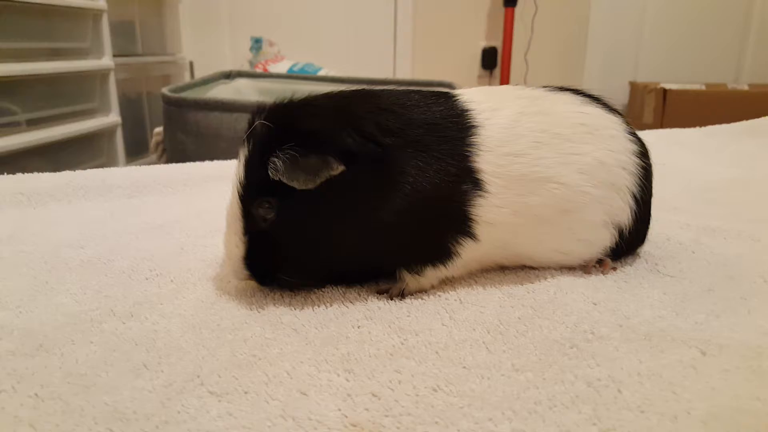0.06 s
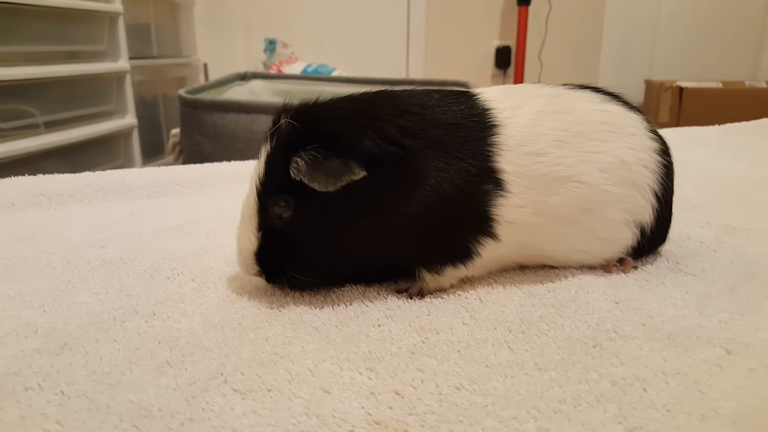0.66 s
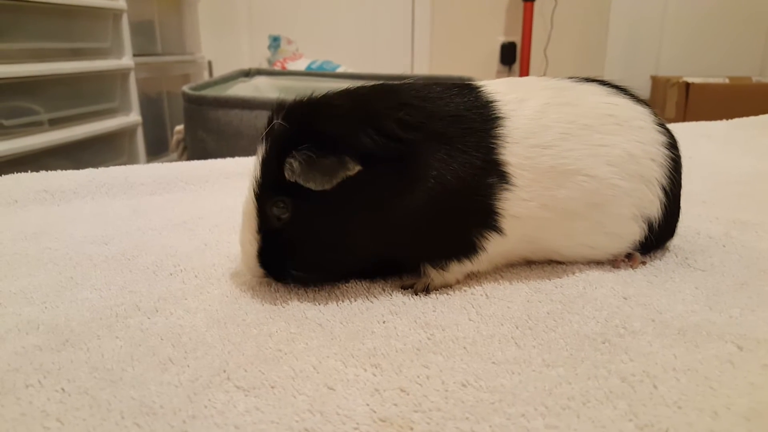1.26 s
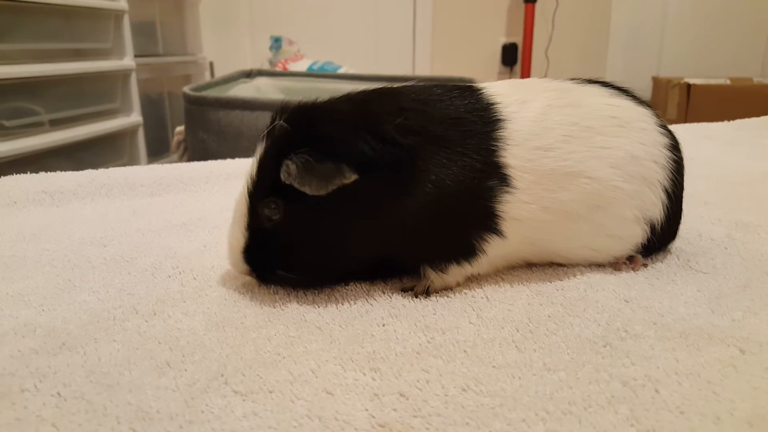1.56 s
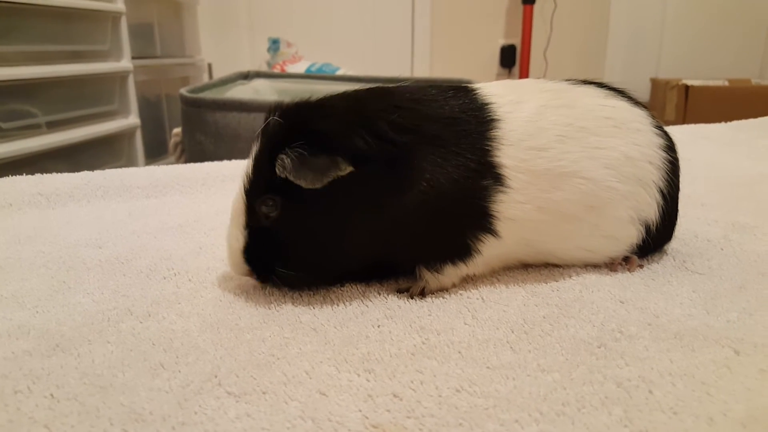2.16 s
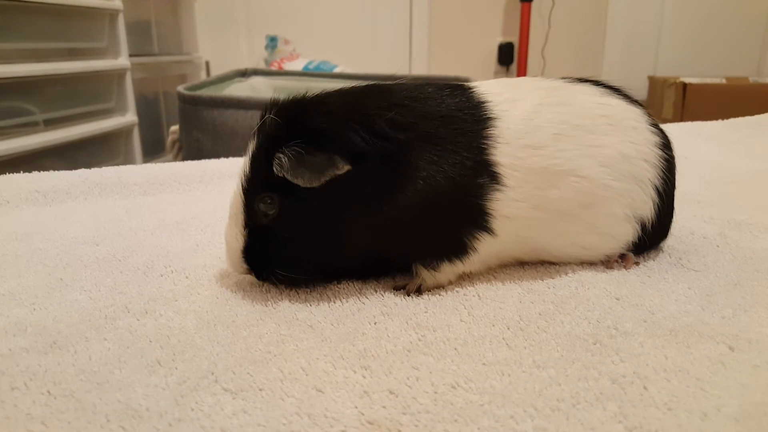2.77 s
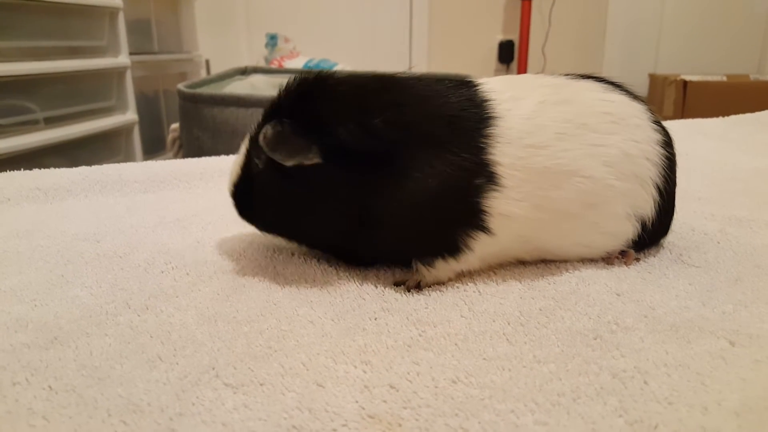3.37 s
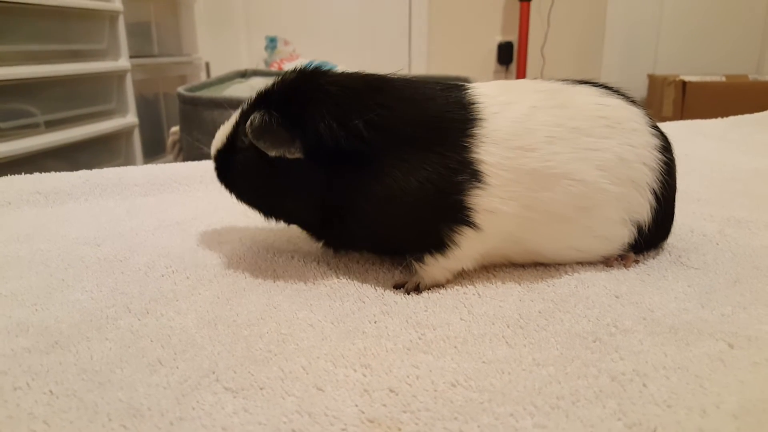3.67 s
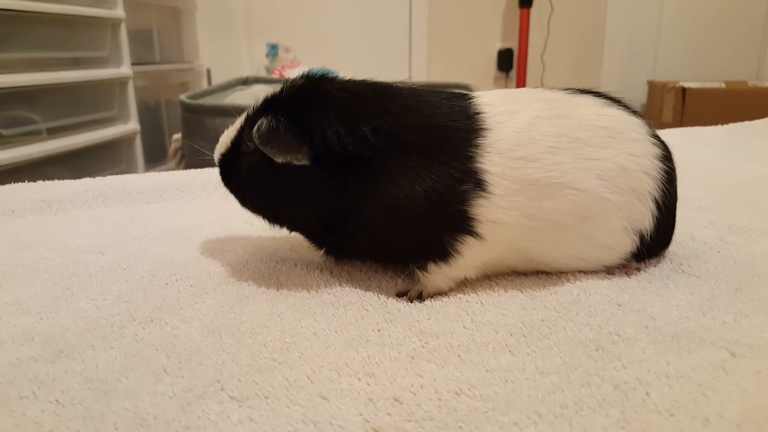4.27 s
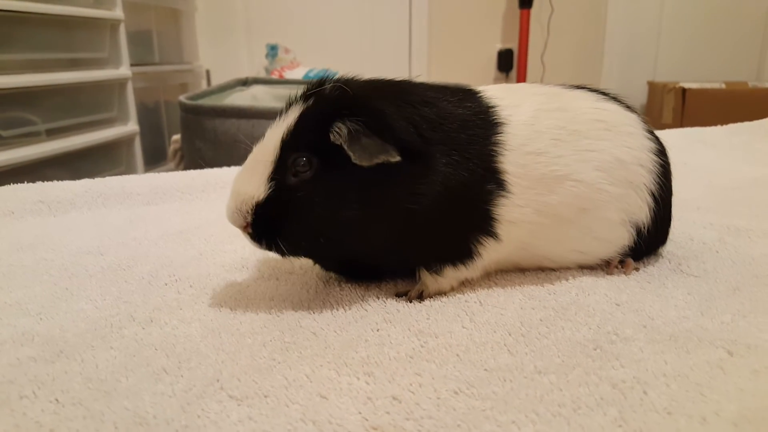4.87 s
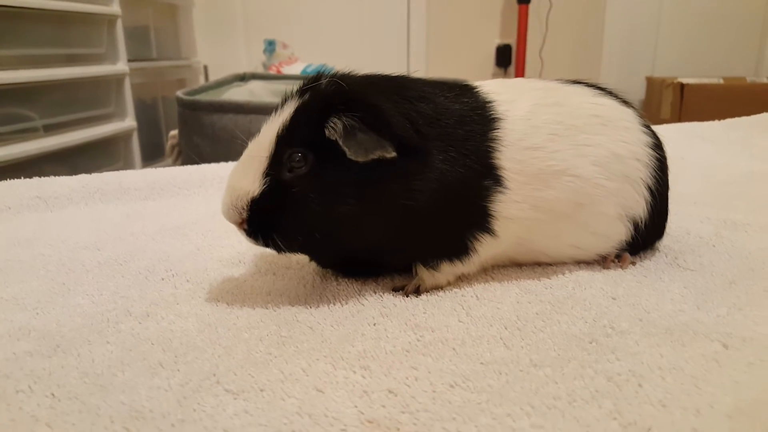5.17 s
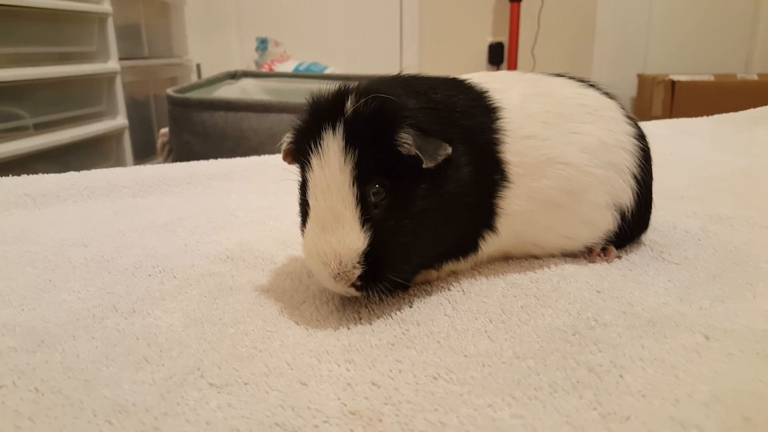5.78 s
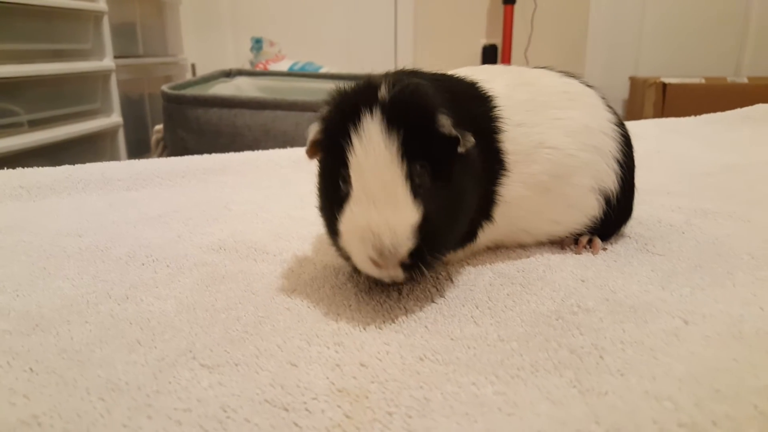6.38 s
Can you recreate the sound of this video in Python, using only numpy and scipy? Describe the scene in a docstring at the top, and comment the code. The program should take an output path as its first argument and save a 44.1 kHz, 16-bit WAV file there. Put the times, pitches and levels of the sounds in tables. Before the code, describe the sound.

A guinea pig chutters close to the microphone in a small furnished room for about six and a half seconds. Each squeak is a very short, clean note that flicks upward at its end, with a slight room echo. For the first 3 seconds the calls are soft, fairly low and even, about five a second. Between roughly 0.4 and 2.3 seconds, faint padded bumps and brief rubs come as the animal shifts on a towel. From about 3.3 seconds the squeaks become louder, higher and brighter, often in quick pairs until 4.7 seconds. Fur rustles faintly, with small swells of low rumble as the head moves. From about 5.7 seconds come the last four calls, slightly longer, the loudest, and more clearly rising. Quiet room air, hiss and a faint low electrical hum continue underneath throughout.

```python
"""Short, soft squeaks come one after another: a guinea pig on a towel chutters close to a phone.
Its vocal folds hold a clean note, then tighten so that the note flicks upward as it ends.
Nearby surfaces and the small furnished room answer each squeak. As the animal moves, fur and cloth
rustle faintly and its body makes a few soft bumps. Behind it all are mains hum, room rumble and hiss."""
import sys
import numpy as np
from scipy import signal
from scipy.fft import rfft, irfft, next_fast_len
from scipy.io import wavfile
from scipy.ndimage import uniform_filter1d

SR = 44100
rng = np.random.default_rng(int(sys.argv[2]) if len(sys.argv) > 2 else 0)


def transcribe(u):
    """Save the signal u as a 16-bit wav file named by the first command-line argument.

    u: samples, shape (n,) or (channels, n), limited to [-1, 1]; the rate is SR.
    q: integer samples, one column per channel.
    """
    v = np.clip(np.atleast_2d(u).T, -1, 1)
    q = np.round(v * 32767).astype(np.int16)
    wavfile.write(sys.argv[1], SR, q)


N = 292383
TIME = np.arange(N) / SR

# The calls. Each row: start in seconds, length in seconds, hold before the flick in seconds,
# base pitch in Hz, base level in dB, swell up to that level in dB.
SQUEAKS = [(0.039, 0.018, 0.0095, 518.0, -41.0, 0.0), (0.172, 0.056, 0.0515, 624.0, -41.0, 0.0),
           (0.48, 0.018, 0.012, 497.0, -51.5, 0.0), (0.708, 0.053, 0.0475, 623.0, -43.5, 7.0),
           (0.907, 0.058, 0.058, 669.0, -40.5, 14.0), (1.095, 0.047, 0.039, 591.0, -41.0, 0.0),
           (1.256, 0.06, 0.049, 612.0, -40.0, 0.0), (1.445, 0.061, 0.0605, 624.0, -39.0, 2.0),
           (1.632, 0.066, 0.0585, 628.0, -38.5, 1.0), (1.817, 0.07, 0.065, 639.0, -39.0, 1.0),
           (2.022, 0.064, 0.0565, 620.0, -38.5, 3.0), (2.207, 0.066, 0.062, 610.0, -39.0, 0.0),
           (2.435, 0.06, 0.0615, 571.0, -43.5, 0.0), (2.644, 0.063, 0.0545, 595.0, -40.0, 0.0),
           (2.839, 0.072, 0.0665, 604.0, -40.0, 1.0), (3.174, 0.042, 0.036, 627.0, -45.0, 8.0),
           (3.342, 0.06, 0.0465, 668.0, -39.5, 1.0), (3.45, 0.058, 0.0435, 703.0, -41.0, 0.0),
           (3.626, 0.071, 0.0535, 699.0, -35.5, 1.0), (3.724, 0.064, 0.049, 774.0, -35.5, 0.0),
           (3.915, 0.073, 0.063, 666.0, -36.5, 4.0), (4.032, 0.06, 0.047, 633.0, -40.0, 0.0),
           (4.219, 0.068, 0.0615, 680.0, -36.0, 4.0), (4.331, 0.063, 0.0465, 645.0, -40.5, 0.0),
           (4.524, 0.068, 0.0555, 688.0, -35.5, 4.0), (4.629, 0.059, 0.0445, 664.0, -36.0, 1.0),
           (4.817, 0.086, 0.0605, 676.0, -35.0, 1.0), (5.104, 0.075, 0.062, 659.0, -36.0, 3.0),
           (5.354, 0.066, 0.059, 662.0, -36.5, 6.0), (5.459, 0.055, 0.0415, 651.0, -35.5, 2.0),
           (5.565, 0.048, 0.041, 812.0, -36.0, 5.0), (5.736, 0.083, 0.06, 717.0, -32.5, 7.0),
           (5.977, 0.096, 0.069, 692.0, -35.0, 4.0), (6.179, 0.1, 0.072, 702.0, -33.0, 4.0),
           (6.398, 0.1, 0.0715, 681.0, -33.0, 3.0)]
# The voice with the head tucked down, then raised, then turned to the phone. Each row: time in seconds,
# second harmonic boost in dB, upper harmonics boost in dB, mouth cut-off in Hz, flick gain in dB/octave.
POSTURE = [(.2, -4, -1, 2200, -13.5), (1.5, -2, 3, 2250, -11), (3.1, -3, -1, 2180, -15),
           (3.4, 3, 9, 1880, 7.5), (3.95, 3, 5.5, 1780, -3.5), (4.65, .5, 4, 1830, 4),
           (4.8, -3, -8.5, 2560, .5), (5.5, -5.5, -6.5, 2610, -2.5), (6, -4, -.5, 2650, -4.5),
           (6.2, -3, -1.5, 3250, 3)]
# How the throat shapes the voice. Each row: frequency in Hz, gain in dB.
THROAT_CURVE = [(500, -1.5), (650, 0), (1000, -0.5), (1300, -4.5), (1950, -7), (2450, -8.5), (2800, -4.5),
                (3200, -16.5), (3700, -24), (4200, -40)]
# Where the head points. Each row: time in seconds, left minus right level in dB, left lead in ms.
HEAD_DIRECTION = [(0, 1.3, 0.1), (2.2, 1, 0.14), (3.7, 1, 0.12), (5.2, 0.5, 0.16), (5.8, -1, 0.12),
                  (6.4, -1.5, 0.053)]
# The right microphone is shaded from the animal. Each row: frequency in Hz, gain in dB.
SHADE_CURVE = [(600, 0.45), (900, -2), (1300, -2.5), (2000, -6.2), (3200, -0.5)]
# Echoes from near surfaces. Each row: delay in ms, left gain in dB, right gain in dB.
NEAR_ECHOES = [(12.58, -29, -28), (20.42, -32.5, -25.5)]
# The tone of the room's fading tail. Each row: frequency in Hz, gain in dB.
ROOM_CURVE = [(200, -8), (600, 5), (800, 11), (1000, 11), (1400, 3), (2000, 4), (3000, 2), (8000, 0)]
# The body shifts on the towel. Each row: start in seconds, bump level in dB, rustle level in dB.
SHUFFLES = [(.405, -63.5, -69), (.513, -61, -65), (.752, -60, -66), (.937, -59, -72), (.975, -62.5, -66),
            (1.15, -58.5, -68), (1.405, -62, -67), (1.863, -55.5, -67), (1.885, -56, -63),
            (2.115, -65, -66), (2.244, -59.5, -64)]
# The low notes a bump rings with. Each row: frequency in Hz, relative level in dB.
BUMP_NOTES = [(105, -7.5), (158, 3), (188, -3), (262, -19), (345, -9.5), (420, -10.5)]
# The tone of the rubbing inside a bump. Each row: frequency in Hz, gain in dB.
RUB_CURVE = [(60, -82), (180, 20), (450, 5), (1500, 0), (6000, -70)]
# Head movements brush the fur and stir a rumble.
# Each row: peak time in seconds, half length in seconds, rustle level in dB, rumble level in dB.
HEAD_MOVES = [(3.297, .014, -62.5, -80), (3.54, .16, -73, -64), (4.66, .06, -69, -72),
              (4.82, .06, -65, -68), (5.81, .05, -68, -72), (6.1, .1, -70.5, -70), (6.43, .07, -65, -62)]
# Brief rubs and one low swell of rumble.
# Each row: peak time in seconds, half length in seconds, level in dB, centre in Hz.
RUBS_AND_SWELL = [(.302, .012, -65, 780), (1.405, .01, -69, 2900), (1.438, .012, -60, 730),
                  (1.748, .017, -56, 730), (2.135, .022, -56, 660), (4.77, .08, -62.5, 86),
                  (6.5, .08, -68, 330)]
# The tone of three noises: rustle, rumble, and air with hiss. Each row: frequency in Hz, gain in dB.
RUSTLE_CURVE = [(400, 22), (1200, 11.5), (2500, 11), (4500, 3), (7000, -4), (10000, 3), (12500, -1),
                (16000, -10)]
RUMBLE_CURVE = [(20, -8), (45, -17.5), (85, -3), (130, -5.5), (220, -15), (500, -41.5)]
AIR_CURVE = [(25, 20), (60, 13), (160, 22), (260, 20.5), (450, 18), (900, 15), (1800, 8), (3500, 3.5),
             (7000, -3.5), (10000, -4.5), (13000, -4), (15500, 2.5)]
# How loud the mains hum is. Each row: time in seconds, level in dB.
HUM_LEVELS = [(0, -70), (.55, -71), (2, -80), (3.1, -79), (5.6, -65), (6.6, -65)]

CLIMB_HZ_PER_S, BEND_S = 48000, .006  # every flick bends into the same straight climb
WAVER, JITTER = .006, .006  # slow and quick unsteadiness, as shares of the pitch
PITCH_PER_DB = .017  # share by which the pitch rises with effort
SOFT_DB, DULLING = -40, .6  # below this level the overtones lose an extra .6 dB per dB
RELAXED_HZ, RELAXED_RANGE_HZ = 660, 50  # calls below 660 Hz sag midway, fully so 50 Hz lower
SAG_DB, SAG_OVERTONES_DB, SAG_PITCH = -1.9, -7, .02  # a sag is softer, duller and lower
FLICK_DB, FLICK_OVERTONES_DB = 1, -.6
# A call right after another starts with the folds still tight: higher and brighter.
RECOVER_S, TIGHT_HZ, TIGHT_SETTLE_S, TIGHT_OVERTONES_DB = .025, 250, .007, 5


def squeak(row, tightness, edge_s=.0039, shimmer_db=.75, rasp_db=2.3, slope_db=-5, upper_step_db=-3.2):
    """One call: the vocal folds hold a note, then tighten so that it flicks up as the air runs out."""
    start_s, length_s, hold_s, held_hz, held_db, swell_db = row
    second_db, upper_db, mouth_hz, flick_db_per_octave = read_table(POSTURE, start_s)
    t = np.arange(int(length_s * SR)) / SR
    progress = np.minimum(t / hold_s, 1)
    # In low, relaxed calls the folds slacken midway through the hold.
    relaxed = np.clip((RELAXED_HZ - held_hz) / RELAXED_RANGE_HZ, 0, 1)
    sag = relaxed * (np.sin(np.pi * progress) ** 4 - .3)
    # The pitch follows the growing effort, then bends smoothly into the flick.
    effort_bend = PITCH_PER_DB * swell_db * (progress - 1)
    note_hz = held_hz * (1 + effort_bend - SAG_PITCH * sag + WAVER * drift(90, len(t)))
    climb = np.logaddexp(0, (t - hold_s) / BEND_S)  # near zero, then a straight ramp
    flick_hz = CLIMB_HZ_PER_S * BEND_S * climb
    hz = note_hz + flick_hz + tightness * TIGHT_HZ * np.exp(-t / TIGHT_SETTLE_S)
    # Tense folds sound louder and a little raspy.
    tension = 1 - np.exp(-climb)
    jitter = JITTER * (1 + 2 * tension) * drift(280, len(t))
    phase = 2 * np.pi * np.cumsum(hz * (1 + jitter)) / SR
    note_db = held_db - swell_db * (1 - progress) ** 2
    level_db = note_db + SAG_DB * sag + flick_db_per_octave * np.log2(1 + flick_hz / held_hz)
    level_db += tension * (FLICK_DB + rasp_db * drift(450, len(t)))
    bright_db = SAG_OVERTONES_DB * sag + FLICK_OVERTONES_DB * tension + TIGHT_OVERTONES_DB * tightness
    bright_db += DULLING * np.minimum(note_db - SOFT_DB, 0)
    cutoff_hz = mouth_hz * (1 + .042 * (t / length_s - .5))  # the mouth barely opens
    voice = 0
    for k in range(1, 6):  # harmonic k sounds at k times the pitch
        harmonic_db = slope_db * np.log2(k) + shimmer_db * k * drift(100, len(t))
        if k == 2:
            harmonic_db += bright_db + second_db
        elif k > 2:
            harmonic_db += bright_db + upper_db + upper_step_db * (k - 3)
        mouth = 1 / np.sqrt(1 + (k * hz / cutoff_hz) ** 16)  # swallows what climbs past the cut-off
        voice += gain(harmonic_db) * curve_gain(k * hz, THROAT_CURVE) * mouth * np.cos(k * phase)
    fade = np.sin(np.pi / 2 * np.clip(np.minimum(t, length_s - t) / edge_s, 0, 1)) ** 2
    return voice * fade * gain(level_db)


def guinea_pig():
    """All the squeaks in a row; the vocal folds relax in the pauses."""
    out = np.zeros(N + SR)
    last_end_s = -np.inf
    for row in SQUEAKS:
        start_s, length_s = row[:2]
        tightness = np.exp((last_end_s - start_s) / RECOVER_S)
        add_at(out, start_s, squeak(row, tightness))
        last_end_s = start_s + length_s
    return out[:N]


def direct_path(voice):
    """The voice goes straight to both microphones, reaching the left one slightly sooner."""
    pan_db, lead_ms = read_table(HEAD_DIRECTION, TIME)
    delayed = np.interp(TIME - lead_ms / 1000, TIME, voice)
    return np.array([voice * gain(pan_db / 2), shape_tone(delayed, SHADE_CURVE) * gain(-pan_db / 2)])


def room(voice, ring_s=.22, tail_db=-17, build_s=.0067, width=.73):
    """Near surfaces return two echoes; many later ones blur into a short tail."""
    t = np.arange(SR // 2) / SR
    envelope = die_away(t, ring_s) * np.clip(t / build_s, 0, 1) ** 2
    mid, side = rng.standard_normal((2, len(t))) * envelope
    tail = normalise(left_right(mid, width * side)) / np.sqrt(len(t))
    echoes = shape_tone(tail, ROOM_CURVE) * gain(tail_db)
    for delay_ms, left_db, right_db in NEAR_ECHOES:
        echoes[:, int(delay_ms * SR / 1000)] += gain([left_db, right_db])
    return signal.fftconvolve(voice[None], echoes, axes=1)[:, :N]


def bumps(contact_s=.0027, ring_s=.32, rub_share=.48, detune=.039):
    """Padded knocks: the body's soft push rings low notes that die quickly, with a little rubbing."""
    out = np.zeros(N + SR)
    t = np.arange(SR // 3) / SR
    envelope = (1 - np.exp(-t / contact_s)) * die_away(t, ring_s)
    envelope /= envelope.max()
    for start_s, bump_db, _ in SHUFFLES:
        ring = 0
        for hz, note_db in BUMP_NOTES:
            mistune, offset = rng.standard_normal(2)
            ring += gain(note_db) * np.sin(2 * np.pi * hz * (1 + detune * mistune) * t + np.pi * offset)
        rub = shape_tone(rng.standard_normal(len(t)), RUB_CURVE)
        bump = normalise(ring) + rub_share * normalise(rub)
        add_at(out, start_s, gain(bump_db) * bump * envelope)
    return out[:N]


def rustles(grain_db=4, resting_db=-82, lag_s=.012):
    """Fibres slip in tiny grains whenever the animal shuffles, moves its head or calls."""
    power = gain(resting_db) ** 2
    power += sum(stroke(s + lag_s, half_s=.034, db=db) for s, _, db in SHUFFLES)
    power += sum(stroke(s, half_s, db) for s, half_s, db, _ in HEAD_MOVES)
    power += sum(stroke(s + hold_s, half_s=.035, db=-74) for s, _, hold_s, *_ in SQUEAKS)
    grains = stereo_noise(5800) * gain(grain_db * drift(900, N))
    return lean_right(normalise(shape_tone(grains, RUSTLE_CURVE)) * np.sqrt(power))


def rubs_and_swell(spread=1.2, skirt_db=-26):
    """Brief rubs and one low swell of rumble: noise around one frequency grows and fades."""
    out = np.zeros((2, N + SR))
    t = np.arange(SR // 2) / SR - 1 / 4  # zero at the peak
    for peak_s, half_s, db, hz in RUBS_AND_SWELL:
        band = [(hz / 8, 3 * skirt_db), (hz / 2, skirt_db), (hz / spread, -3), (hz, 0),
                (hz * spread, -3), (hz * 2, skirt_db), (hz * 8, 3 * skirt_db)]
        mid, side = normalise(shape_tone(rng.standard_normal((2, len(t))), band))
        width = min(.3 + hz / 4000, 1)  # higher sounds are wider
        envelope = np.exp(-(t / half_s) ** 2 / 2)
        add_at(out, peak_s + t[0], left_right(mid, width * side) * gain(db) * envelope)
    return out[:, :N]


def air_and_hiss(level_db=-68.5, flicker_db=.7):
    """Still room air and microphone hiss make a nearly steady bed of noise."""
    noise = normalise(shape_tone(stereo_noise(1500), AIR_CURVE))
    return noise * gain(level_db + flicker_db * drift(9, N))


def rumble(resting_db=-75, flutter_db=2.5):
    """Low room noise that swells when the animal moves its head."""
    power = gain(resting_db) ** 2 + sum(stroke(s, half_s, db) for s, half_s, _, db in HEAD_MOVES)
    noise = normalise(shape_tone(stereo_noise(2700), RUMBLE_CURVE))
    return lean_right(noise * np.sqrt(power) * gain(flutter_db * drift(12, N)))


def mains_hum(hz=60, waver_db=1.5):
    """Mains electricity hums on one low note, which fades down and later grows louder."""
    level_db = read_table(HUM_LEVELS, TIME)[0]
    return lean_right(np.sin(2 * np.pi * hz * TIME) * gain(level_db + waver_db * drift(3.1, N)))


def gain(db):
    """Turn decibels into a number to multiply by."""
    return 10 ** (np.asarray(db) / 20)


def read_table(table, time_s):
    """Each column's value at a given time, sliding between the rows."""
    times, *columns = np.transpose(table)
    return [np.interp(time_s, times, column) for column in columns]


def curve_gain(hz, curve):
    """Look up the gain of a tone curve at a frequency."""
    curve_hz, db = np.transpose(curve)
    return gain(np.interp(np.log(np.maximum(hz, 1)), np.log(curve_hz), db))


def shape_tone(x, curve):
    """Turn each frequency of a sound up or down along a curve."""
    size = x.shape[-1]
    padded = next_fast_len(size)
    gains = curve_gain(np.fft.rfftfreq(padded, 1 / SR), curve)
    return irfft(rfft(x, padded) * gains, padded)[..., :size]


def normalise(x):
    """Scale a sound to an average power of 1."""
    return x / np.sqrt(np.mean(x ** 2))


def drift(rate_hz, size):
    """A smooth random wander, mostly between -1 and 1."""
    hold = max(int(SR / rate_hz), 1)
    steps = np.repeat(rng.standard_normal(size // hold + 1), hold)
    return uniform_filter1d(steps, hold)[:size]


def die_away(t, ring_s):
    """A fade that drops 60 dB in ring_s seconds."""
    return np.exp(-np.log(1000) * t / ring_s)


def stroke(peak_s, half_s, db, linger=1.13):
    """The power of one movement, which starts faster than it dies."""
    width_s = half_s * np.where(TIME < peak_s, 1 / linger, linger)
    return gain(db) ** 2 * np.exp(-((TIME - peak_s) / width_s) ** 2)


def stereo_noise(widening_hz):
    """Noise at two microphones: alike in the bass, unrelated in the treble."""
    mid, side = rng.standard_normal((2, N))
    width = np.clip(.34 + np.fft.rfftfreq(N, 1 / SR) / widening_hz, 0, 1)
    return left_right(mid, irfft(rfft(side) * width, N))


def left_right(mid, side):
    """Two channels from a shared part and an opposite part."""
    return np.array([mid + side, mid - side])


def lean_right(x, db=2):
    """Make the right channel a little louder than the left."""
    return x * gain([[-db / 2], [db / 2]])


def add_at(out, start_s, sound):
    """Mix a sound in at a given time."""
    start = int(start_s * SR)
    out[..., start:start + sound.shape[-1]] += sound


def scene():
    """The animal calls and moves on its towel, over the quiet noises of the room."""
    voice = guinea_pig()
    foreground = direct_path(voice) + room(voice) + bumps() + rustles() + rubs_and_swell()
    return foreground + air_and_hiss() + rumble() + mains_hum()


def record(dry):
    """The phone cuts the treble above 15750 Hz."""
    return signal.sosfilt(signal.ellip(10, .1, 70, 15750, fs=SR, output="sos"), dry)


dry = scene()
out = record(dry)
transcribe(out)
```